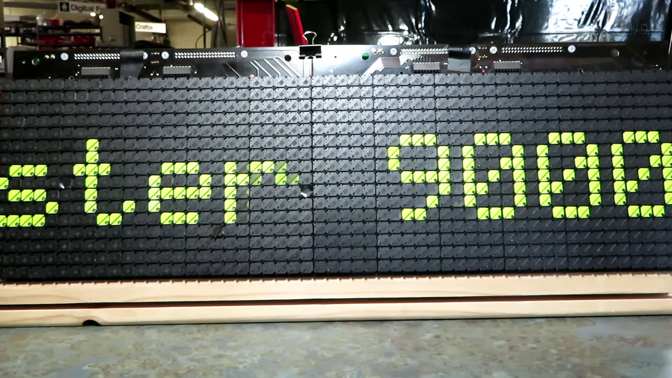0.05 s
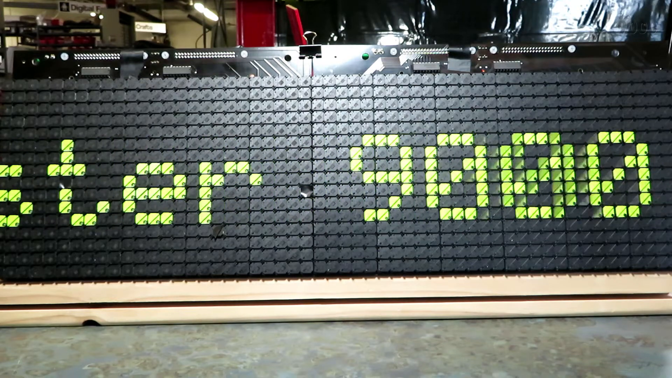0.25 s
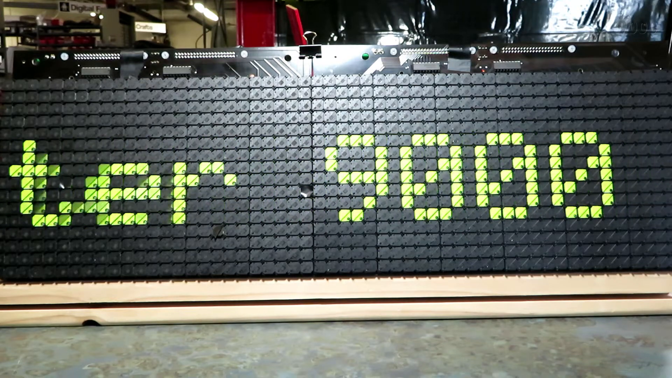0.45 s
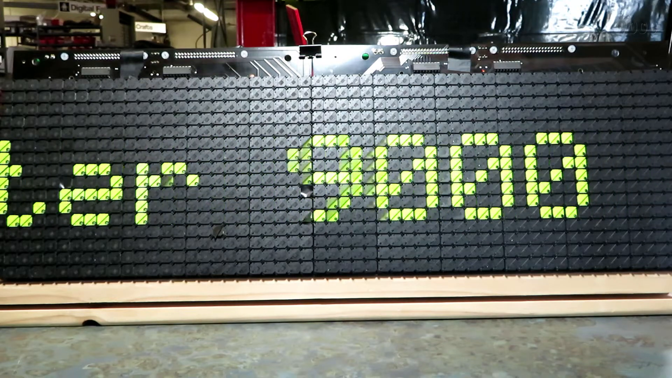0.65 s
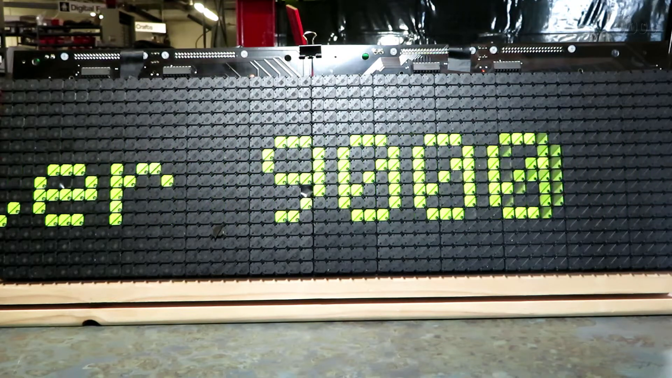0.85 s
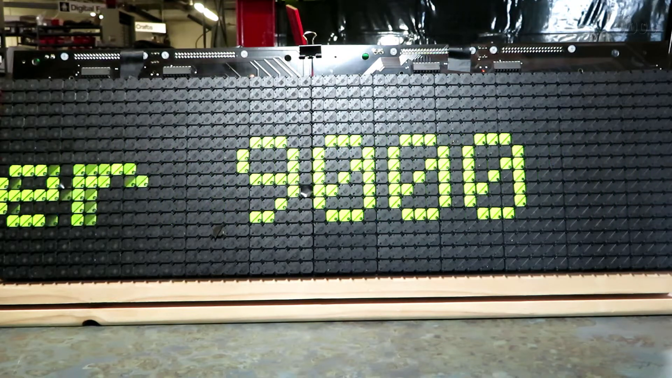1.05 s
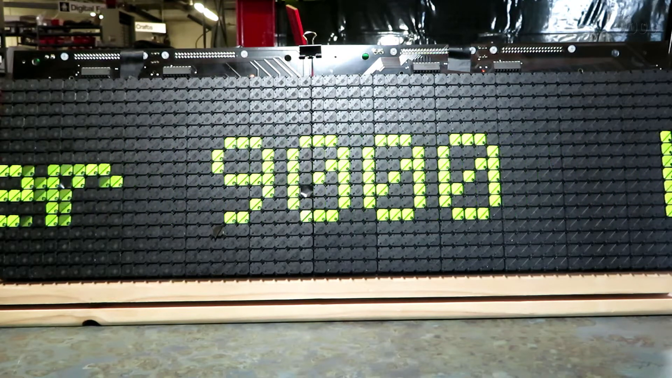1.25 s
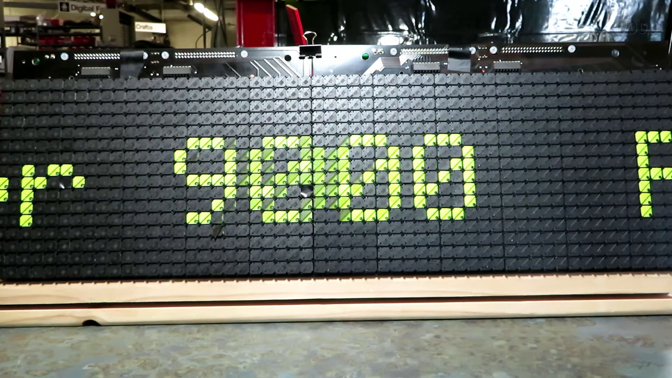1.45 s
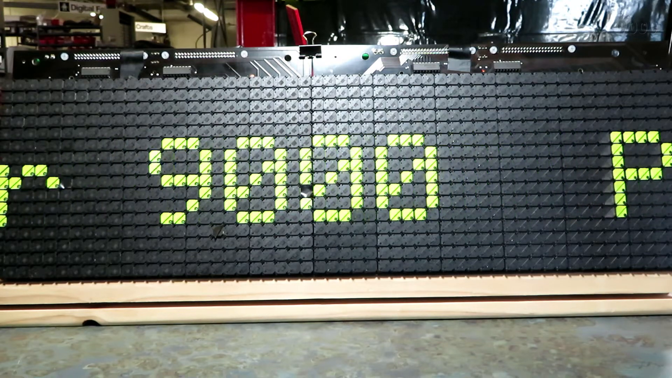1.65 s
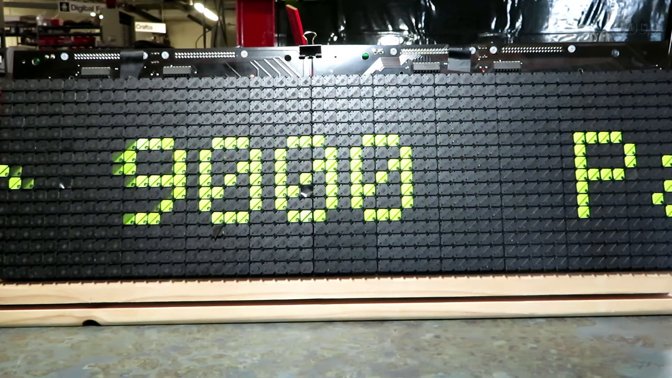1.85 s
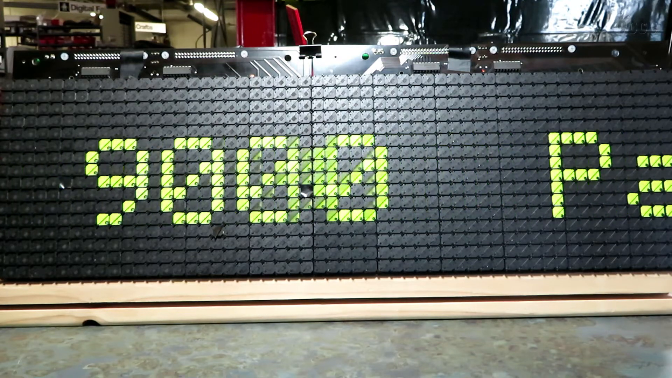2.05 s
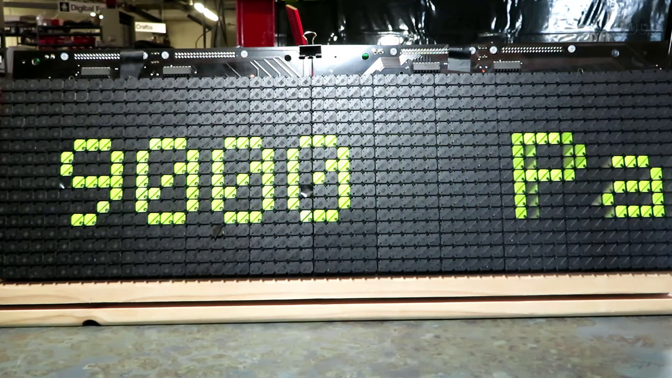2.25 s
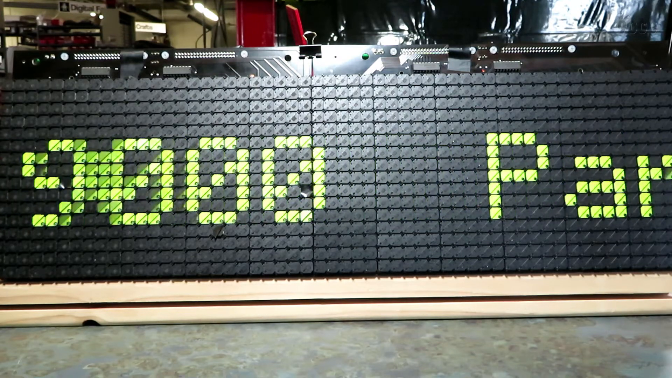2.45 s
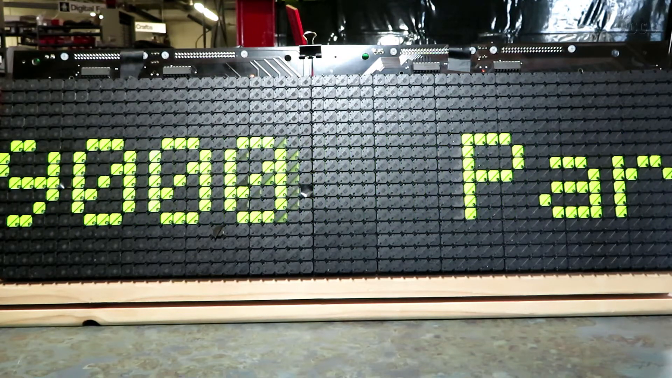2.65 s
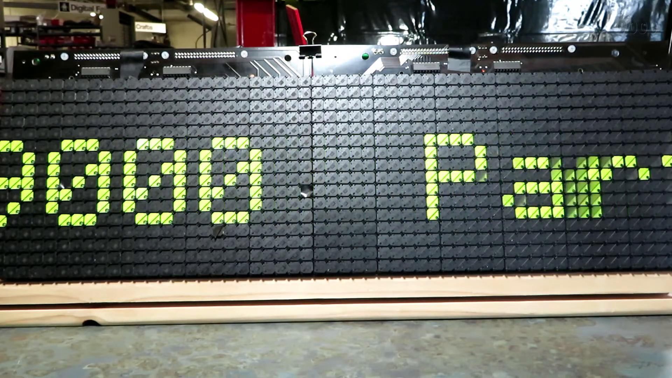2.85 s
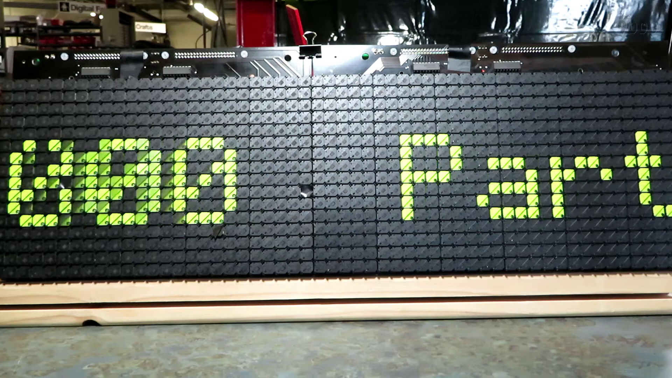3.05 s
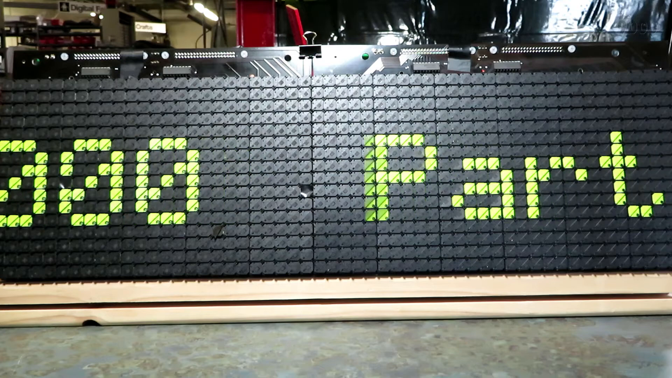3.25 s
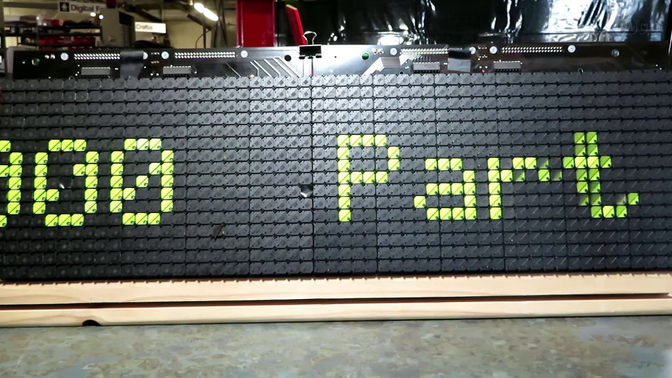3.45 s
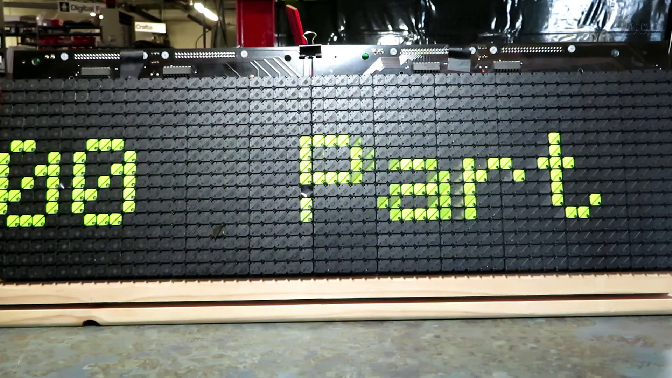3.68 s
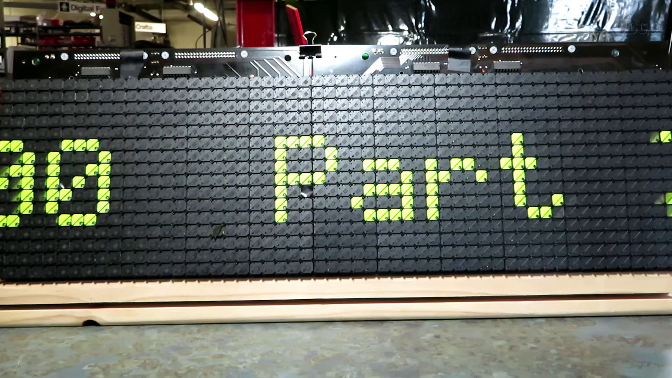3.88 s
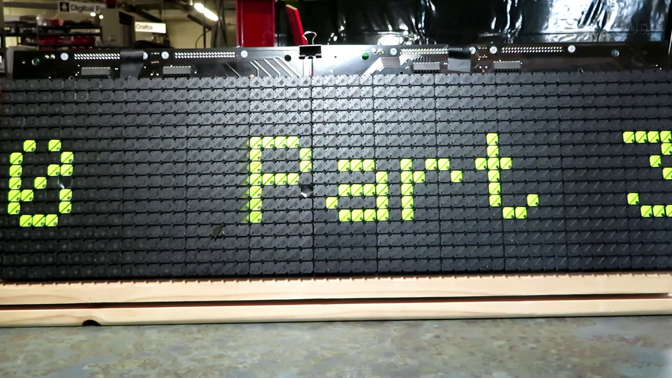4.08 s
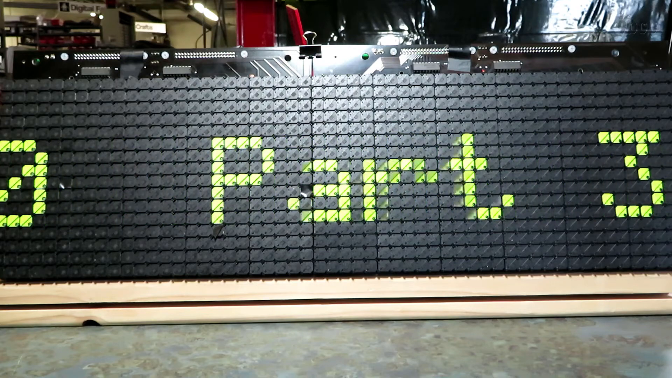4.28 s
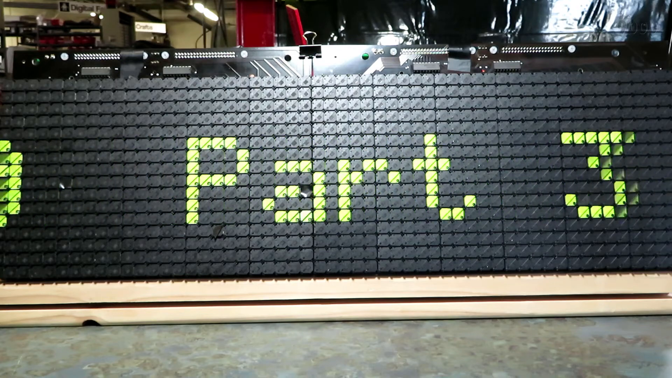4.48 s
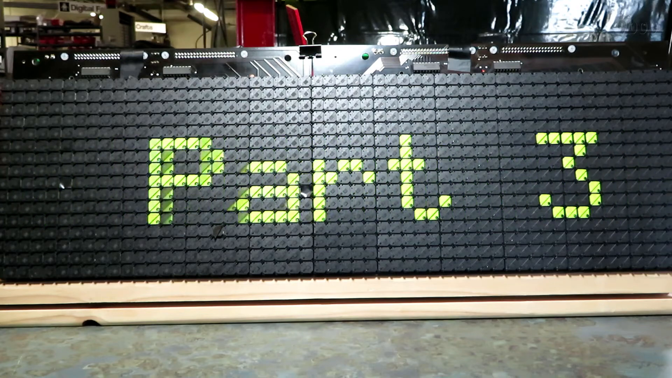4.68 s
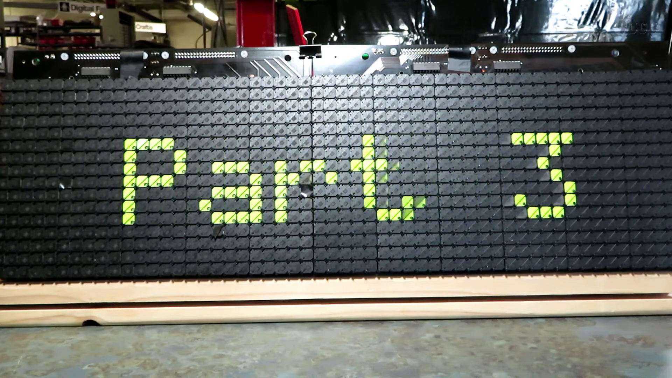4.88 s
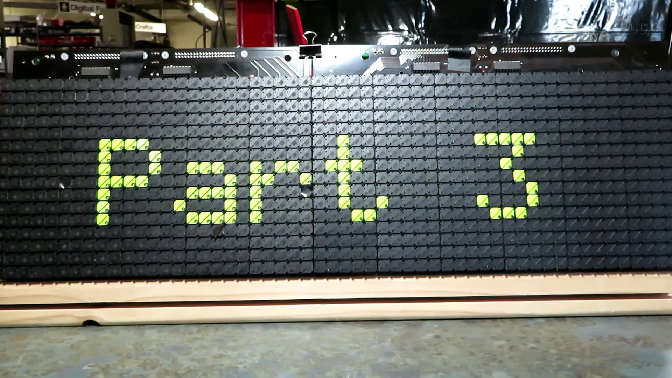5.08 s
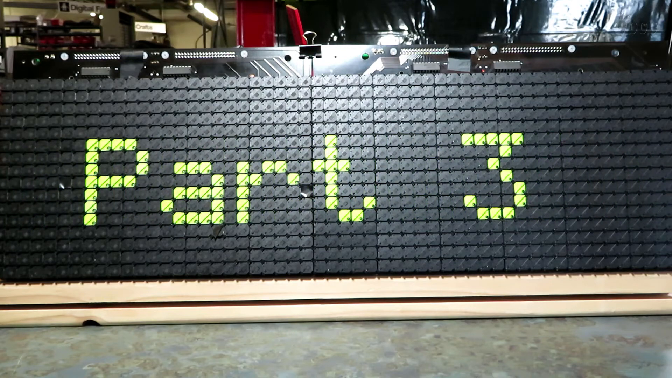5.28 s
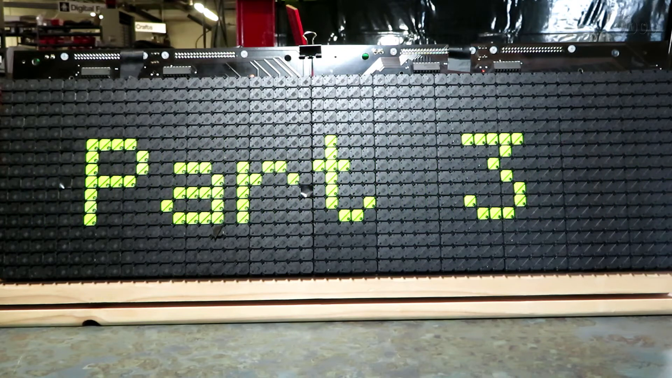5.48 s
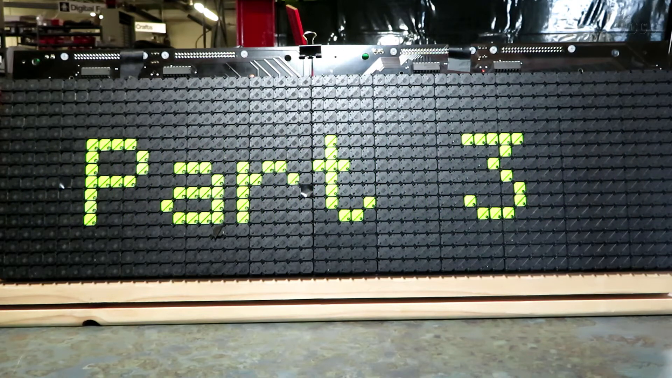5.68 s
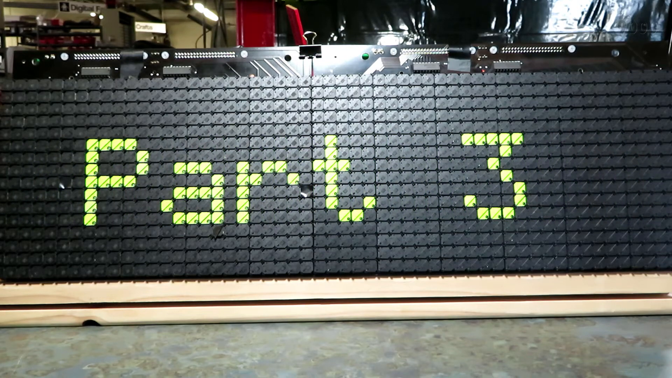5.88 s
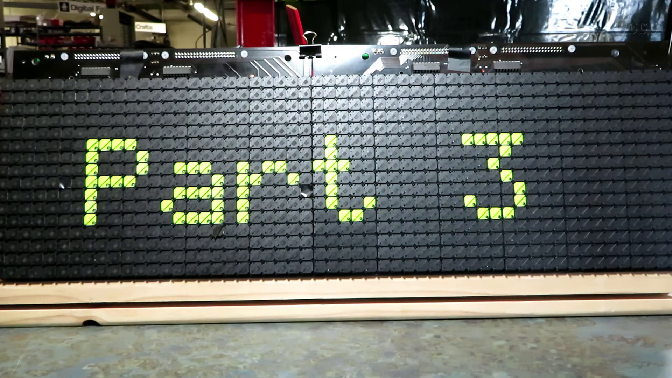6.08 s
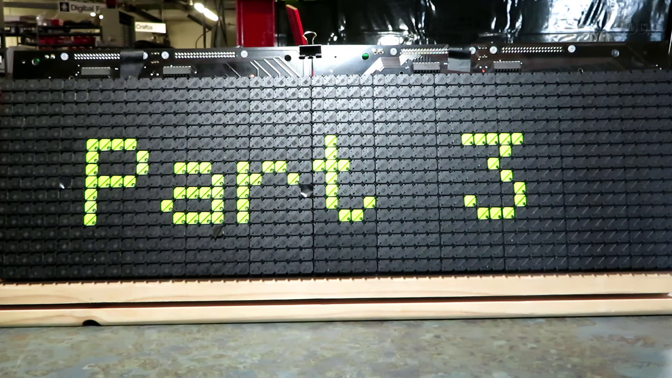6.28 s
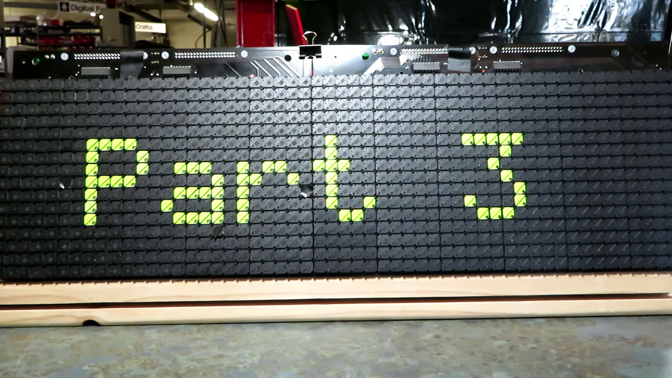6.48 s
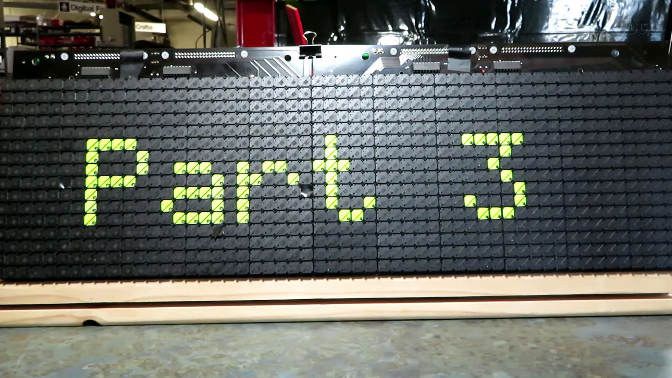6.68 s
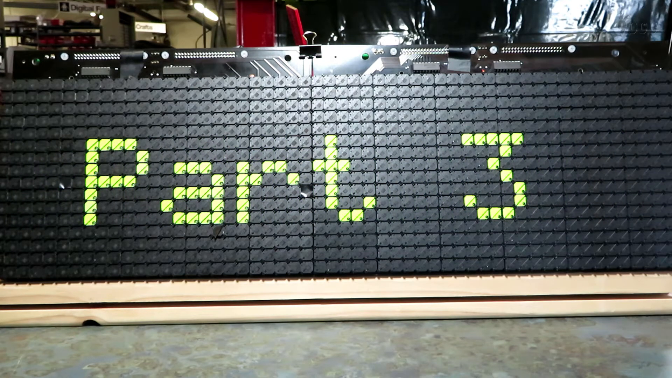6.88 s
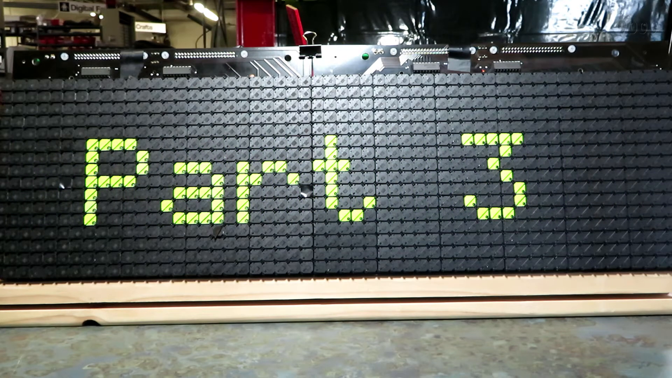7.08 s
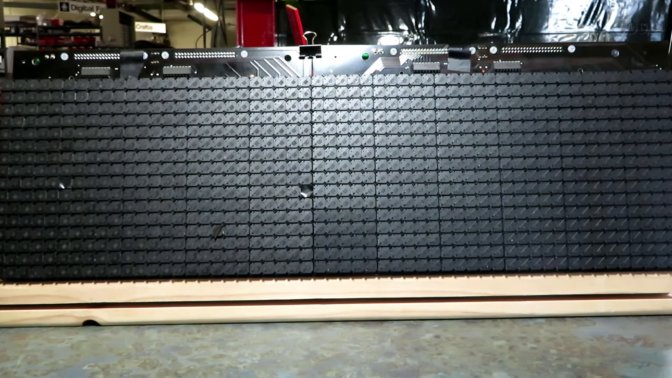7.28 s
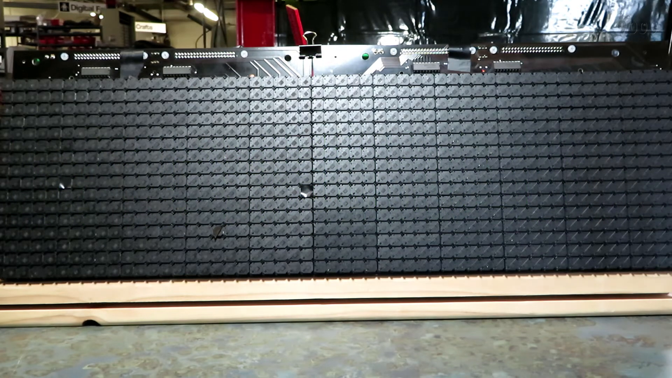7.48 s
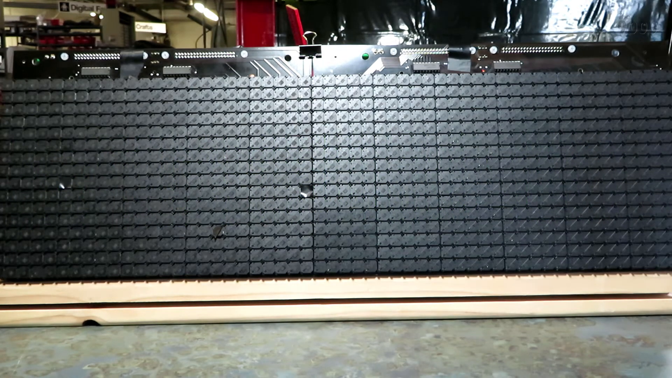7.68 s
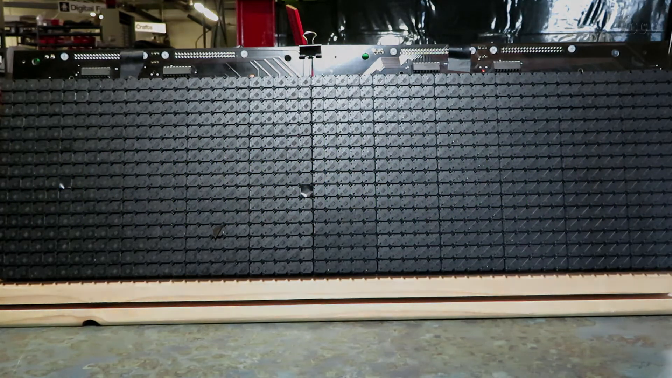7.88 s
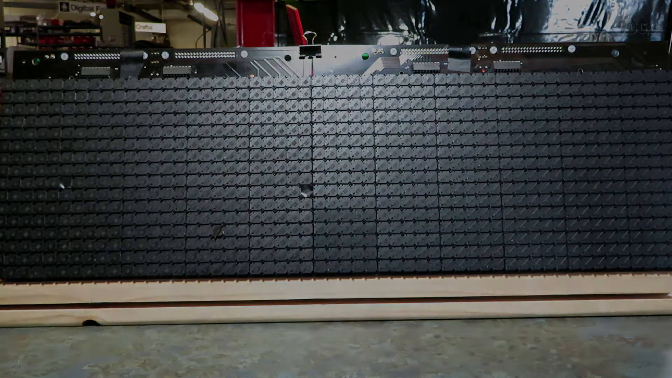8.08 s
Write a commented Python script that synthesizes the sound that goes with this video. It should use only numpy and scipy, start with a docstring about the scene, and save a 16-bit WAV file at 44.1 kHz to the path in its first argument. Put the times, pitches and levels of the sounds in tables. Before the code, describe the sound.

From 0 seconds a fast, dense clatter is already under way: hundreds of tiny light discs swing and snap against their stops, each a very short, bright, dry click with a small bounce and fainter lift-off and coil ticks. The clicks run in left-to-right sweeps of under a tenth of a second, repeating about twelve times a second, so the stream has a fluttering, machine-like rattle with uneven density. Little low end is in the clicks; a short indoor reverberation surrounds them. Underneath is a quiet low ventilation rumble with soft air noise and a duct hum that swells and sinks. At about 5.1 seconds the clatter stops, its tail fading quickly. Only the rumble is left until about 7.2 seconds, when one brief burst of clicks, under a tenth of a second, zips across the panel. The room tail fades and the rumble alone continues to about 8.1 seconds. Close stereo microphones.

```python
"""A fast clatter of discs over a ventilation rumble: a flip-disc sign scrolls text a column at a time in a workshop.
The line then rests, leaving the rumble bare, until one last sweep wipes the panel blank.
A driver sweeps the columns left to right; each turning disc lifts off, swings over, clicks and bounces.
Clicks ring dying sines; decaying noise makes the room tail; shaped noise makes the air, rumble and duct hum."""
import sys
import numpy as np
from scipy import signal
from scipy.fft import rfft, irfft, next_fast_len
from scipy.io import wavfile
from scipy.ndimage import uniform_filter1d

SR = 44100
rng = np.random.default_rng(int(sys.argv[2]) if len(sys.argv) > 2 else 0)


def digitize_waveform(pressure):
    """Quantize a signal to 16-bit integers and store it at the path in sys.argv[1].

    Rows of a 2-D input are taken as channels; values are limited to [-1, 1].
    """
    field = np.atleast_2d(pressure).T
    bounded = np.clip(field, -1, 1)
    quanta = np.round(bounded * 32767).astype(np.int16)
    wavfile.write(sys.argv[1], SR, quanta)


N = 358519   # samples
RUN_IN = 8000   # samples rendered ahead of the start, so that the clatter is already ringing

# words of the scrolling line: first text column, last text column, discs of bars and slants per column
WORDS = [(0, 23, 1), (27.8, 54, 2.2), (65.8, 91.1, 1.47), (95, 104, 0.97)]
# upright strokes of the letters: text column, height/discs
UPRIGHTS = [(2.5, 1.5), (4.6, 2.1), (8.0, 2), (10.5, 1.2), (14.5, 4.6), (16.3, 4.6), (21.0, 2.1),
            (29.3, 0.37), (32.7, 1.4), (35.0, 6.7), (38.4, 2.6), (41.0, 5.5), (45.4, 4), (47.5, 5),
            (51.0, 1.2), (52.8, 3), (67.5, 3.47), (71.0, 1.73), (77.5, 2.1), (79.5, 4.9), (85.5, 2.3),
            (87.4, 4.5), (99.0, 0.81), (102.5, 2.6), (104.0, 4.6)]
# disc, stop and frame ringing together: f/Hz, level/dB, t60/s
DISC_MODES = [(1900, -44, 0.0052), (2337, -17.5, 0.011), (2564, -18, 0.018), (2760, -9, 0.0045),
              (3100, -18.5, 0.0086), (3970, -8.5, 0.0048), (4720, -1.5, 0.0039), (5170, -1, 0.0035),
              (5670, -2, 0.0026), (7300, 1.5, 0.0015), (8100, -6.5, 0.0021), (9420, -5.5, 0.0013),
              (11130, -13, 0.00054), (12250, 0.5, 0.0022), (13060, 1, 0.0015), (13400, 3, 0.0011),
              (15220, -11.5, 0.00184)]
# nearness of the panel to the microphone: panel column, level/dB
NEARNESS = [(0, -4.5), (30, -2.5), (56, -2.5)]
# air noise spectrum, relative: f/Hz, level/dB
AIR_SPECTRUM = [(90, -30), (160, -3), (260, -7), (330, -14.5), (480, -15), (570, -19), (760, -16),
                (930, -18.5), (1500, -23), (2100, -32.5), (3800, -37), (5000, -35), (11600, -45),
                (13000, -69)]
# air noise over time: t/s, level/dB
AIR_FLOW = [(0, -52), (4.1, -52), (5.6, -55), (8.13, -53.5)]
# duct rumble spectrum, relative: f/Hz, level/dB
RUMBLE_SPECTRUM = [(12, -44), (22, -17.5), (50, -1), (100, -5), (140, -4.5), (170, -32), (220, -44),
                   (370, -92.5)]
# rumble over time: t/s, broad level/dB, lower resonance level/dB, upper resonance level/dB
RUMBLE_LEVEL = [(0.0, -46.5, -44, -56), (0.11, -52.5, -42, -57.5), (0.61, -48, -50, -46.5),
                (1.9, -48, -50, -50), (2.24, -45, -49.5, -64), (2.31, -46, -44, -43.5),
                (2.81, -45, -59, -48), (2.83, -44.5, -54, -50.5), (3.87, -50.5, -45.5, -49),
                (3.98, -45, -59.5, -44.5), (4.73, -49, -51.5, -63), (5.21, -52.5, -49.5, -50),
                (5.25, -53, -75, -55), (5.34, -54, -56, -57), (5.86, -44.5, -51, -54.5),
                (5.98, -49, -64.5, -49.5), (8.04, -48.5, -47.5, -56.5), (8.13, -52, -57, -58)]
# duct resonances, lower then upper: f/Hz, width at half height/Hz
DUCT_RESONANCES = [(82, 19), (116, 4.9)]
# stereo width of the ventilation: f/Hz, side minus mid level/dB
AIR_SIDE = [(25, -53.5), (60, -45), (110, -45.5), (200, -19), (380, -7), (700, -12.5), (1290, -21),
            (2380, -12), (8000, 1)]

# panel and driver
COLUMNS, ROWS, STEPS = 57, 12, 61
COLUMN_S = .08396 / 57   # time the driver spends on a column
SWEEP_S = 58 * COLUMN_S
FIRST_SWEEP_S, WIPE_S = -2 * COLUMN_S, 7.205   # scroll step 0 and the wipe
REST_COLUMN = 58.6   # text column at the left edge when the line rests
WIPE_BARS, WIPE_UPRIGHTS = .8, 2.1   # discs wiped for each disc that turns in a scroll step

# contacts
LANDING_SPREAD = 1.8   # column slots over which the discs of one column land
CLICK_DB, CLICK_SPREAD_DB, COLOUR_SPREAD_DB = -30, 2.5, 4.5
SWING_S, LIFT_DB, COIL_DB = .016, -15, -19
BOUNCE_S, BOUNCE_DB = .0022, -6.5
RADIATE_HZ = 1930   # small discs radiate little below this

# stereo image of the discs
PORT_LAG_S = 18e-6   # between the two microphone ports
LEAD_HZ = 3900   # low cut of the side signal that carries the lead
SCATTER_DB, SCATTER_HZ = -4, 9500

# room
ZONES = 14   # stretches of the panel, each with its own echo paths
ROOM_DB, ROOM_T60_S = -4.5, .385
TREBLE_T60_S, ROOM_CUT_HZ = .29, 9500
EARLY_DB, EARLY_T60_S = 6, .03   # nearby surfaces, over the start of the late tail
ROOM_SIDE_DB, ROOM_SIDE_HZ = -3.5, 5010   # level and low cut of the tail's side signal

DUCT_STEADY = 0.69   # 0 noise in the resonance, 1 a hum of even height
CUTOFF_HZ = 15650


def amp(db):
    """Decibels to a linear gain."""
    return 10 ** (np.asarray(db) / 20)


def at_hz(points, hz):
    """Read a spectrum table on a log-frequency axis."""
    table_hz, level_db = np.transpose(points)
    return np.interp(np.log(hz), np.log(table_hz), level_db)


def high_pass(x, hz, order=2):
    """Butterworth low cut."""
    return signal.sosfilt(signal.butter(order, hz, "high", fs=SR, output="sos"), x)


def ring(clicks, hz, t60):
    """A unit click sets a dying sine of height 1 ringing in a two-pole resonator."""
    radius = amp(-60 / (t60 * SR))
    w = 2 * np.pi * hz / SR
    feedback = [1, -2 * radius * np.cos(w), radius * radius]
    return signal.lfilter([0, np.sin(w)], feedback, clicks + 1e-18)


def turning_discs(text_column, upright_columns, bars=1, uprights=1):
    """Discs that turn in a text column: a steady few in a word, plus each upright over the columns it covers."""
    at = text_column[..., None]
    first, last, inside = np.transpose(WORDS)
    centre, height = np.transpose(UPRIGHTS)
    in_word = np.clip(np.minimum(at - first, last - at) + 1, 0, 1)
    on_upright = np.clip((upright_columns + 1) / 2 - np.abs(at - centre), 0, 1)
    return bars * in_word @ inside + uprights * on_upright @ height


def sweeps():
    """Time at which each column slot begins to land, its panel column and the number of discs that turn."""
    step, column = np.mgrid[-2:STEPS, 0:COLUMNS]
    start = FIRST_SWEEP_S + step * SWEEP_S + column * COLUMN_S
    # the text slides one column a sweep; an upright turns on, then off
    scrolled = turning_discs(step + column - 2, 2)
    wiped = np.arange(COLUMNS)
    # in the wipe an upright only turns off
    wipe = turning_discs(wiped + REST_COLUMN, 1, WIPE_BARS, WIPE_UPRIGHTS)
    return (np.append(start, WIPE_S + wiped * COLUMN_S),
            np.append(column, wiped),
            np.append(scrolled, wipe))


def contacts():
    """Time, strength and panel column of each landing, bounce, lift-off and coil tick."""
    start, column, count = sweeps()
    # whole discs sound in full, a leftover fraction as a weaker disc
    turning = np.sqrt(np.clip(count[:, None] - np.arange(ROWS), 0, 1))
    delay = LANDING_SPREAD * COLUMN_S * rng.random((2, *turning.shape)).mean(axis=0)
    landing = start[:, None] + delay
    strength = (turning * amp(CLICK_SPREAD_DB * rng.standard_normal(turning.shape))).ravel()
    bounce = landing + BOUNCE_S * (.5 + rng.random(turning.shape))
    lift_off = landing - SWING_S
    coil_tick = start - SWING_S
    s = np.concatenate([landing.ravel(), bounce.ravel(), lift_off.ravel(), coil_tick])
    size = np.concatenate([strength, amp(BOUNCE_DB) * strength, amp(LIFT_DB) * strength,
                           np.full(len(start), amp(COIL_DB))])
    column = np.concatenate([np.tile(np.repeat(column, ROWS), 3), column])
    return s, size * amp(np.interp(column, *np.transpose(NEARNESS))), column


def sample_index(s):
    """Contact times as samples of the rendering with its run-in."""
    return np.clip(np.round(s * SR).astype(int) + RUN_IN, 0, N + RUN_IN - 1)


def discs(s, size, column):
    """Every contact strikes each mode with its own strength; returns mid and side."""
    at = sample_index(s)
    bearing = 1 - 2 * column / (COLUMNS - 1)   # +1 left end, -1 right end
    ringing = np.zeros((3, N + RUN_IN))
    for hz, level_db, t60 in DISC_MODES:
        colour, scatter = rng.standard_normal((2, len(s)))
        polarity = rng.choice([-1, 1], len(s))
        blow = size * amp(CLICK_DB + level_db + COLOUR_SPREAD_DB * colour) * polarity
        trains = [np.bincount(at, weight, N + RUN_IN) for weight in (blow, blow * bearing, blow * scatter)]
        ringing += ring(np.array(trains), hz, t60)
    mid, leaning, scattered = high_pass(ringing, RADIATE_HZ, order=5)
    # a small lead at one port is a time derivative in the side signal
    lead = .5 * PORT_LAG_S * SR * np.gradient(leaning)
    scattered_side = amp(SCATTER_DB) * high_pass(scattered, SCATTER_HZ, order=3)
    return mid, high_pass(lead, LEAD_HZ, order=6) + scattered_side


def zone_owner(s, column, length):
    """Panel stretch of the latest contact at each sample."""
    at = sample_index(s)
    latest = np.zeros(length, int)
    latest[at] = at
    owner = np.zeros(length, int)
    owner[at] = column * ZONES // COLUMNS
    return owner[np.maximum.accumulate(latest)]


def room_tail(t):
    """Two diffuse echo tails: dying noise with a shorter treble and a stronger early part."""
    noise = rng.standard_normal((2, len(t)))
    dull = signal.sosfilt(signal.butter(2, ROOM_CUT_HZ, fs=SR, output="sos"), noise)
    tail = dull * amp(-60 * t / ROOM_T60_S)
    tail += (noise - dull) * amp(-60 * t / TREBLE_T60_S)
    tail += noise * amp(EARLY_DB - 60 * t / EARLY_T60_S)
    fade_in = np.clip(t / 0.0044, 0, 1)
    return tail * fade_in / np.sqrt(np.sum(tail[0] ** 2))


def room(direct, s, column):
    """Each stretch of the panel excites its own diffuse tail; the side is high-passed."""
    t = np.arange(SR // 2) / SR
    owner = zone_owner(s, column, len(direct))
    size = next_fast_len(len(direct) + len(t))
    wet = 0
    for zone in range(ZONES):
        wet = wet + rfft(direct * (owner == zone), size) * rfft(room_tail(t), size)
    mid, side = high_pass(irfft(wet, size)[:, :len(direct)], RADIATE_HZ - 400, order=4)
    return amp(ROOM_DB) * mid, amp(ROOM_DB + ROOM_SIDE_DB) * high_pass(side, ROOM_SIDE_HZ, order=6)


def coloured(colour_at):
    """Mid and side noise with the gain that colour_at gives for each frequency; mid rms 1."""
    size = next_fast_len(N)
    hz = np.maximum(np.arange(size // 2 + 1) * SR / size, 1)
    shape = colour_at(hz) * np.array([np.ones_like(hz), amp(at_hz(AIR_SIDE, hz))])
    noise = irfft(rfft(rng.standard_normal((2, size))) * shape, size)[:, :N]
    return noise / np.std(noise[0])


def duct_hum(centre_hz, width_hz):
    """Noise in a narrow duct resonance, its height partly evened out into a hum."""
    hum = coloured(lambda hz: 1 / (1 + (2 * (hz - centre_hz) / width_hz) ** 2))
    height = np.sqrt(uniform_filter1d(hum[0] ** 2, size=int(2 * SR / centre_hz)) + .02)
    hum = hum / height ** DUCT_STEADY
    return hum / np.std(hum[0])


def ventilation():
    """Air noise over a rumble and two duct resonances that hum, swell and sink."""
    t = np.arange(N) / SR
    s, broad_db, *resonance_db = np.transpose(RUMBLE_LEVEL)
    flow = amp(np.interp(t, *np.transpose(AIR_FLOW)))
    out = flow * coloured(lambda hz: amp(at_hz(AIR_SPECTRUM, hz)))
    out += amp(np.interp(t, s, broad_db)) * coloured(lambda hz: amp(at_hz(RUMBLE_SPECTRUM, hz)))
    for (centre_hz, width_hz), level_db in zip(DUCT_RESONANCES, resonance_db):
        out += amp(np.interp(t, s, level_db)) * duct_hum(centre_hz, width_hz)
    return out


def scene():
    """Discs, their room tail and the ventilation, turned from mid and side into left and right."""
    s, size, column = contacts()
    direct = np.array(discs(s, size, column))
    strong = size > amp(-12)   # only strong contacts choose the echo paths
    wet = room(direct[0], s[strong], column[strong])
    mid, side = (direct + wet)[:, RUN_IN:] + ventilation()
    return np.array([mid + side, mid - side])


def record(dry):
    """A steep elliptic low-pass cuts the top."""
    return signal.sosfilt(signal.ellip(14, .3, 80, CUTOFF_HZ, fs=SR, output="sos"), dry)


dry = scene()
out = record(dry)
digitize_waveform(out)
```